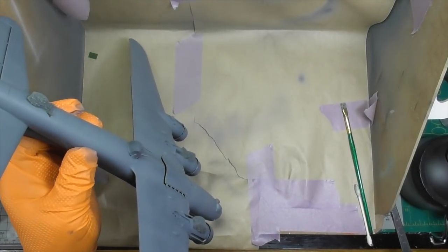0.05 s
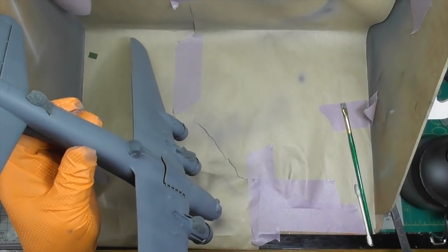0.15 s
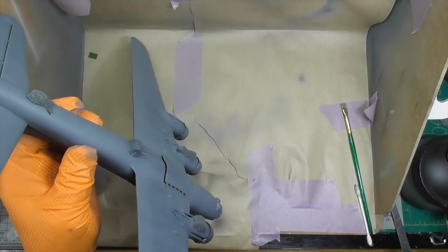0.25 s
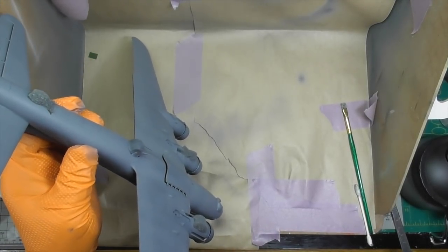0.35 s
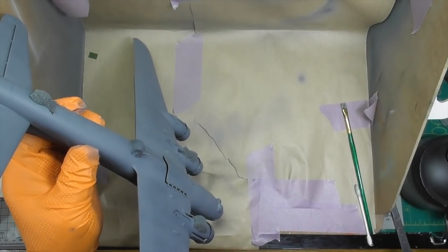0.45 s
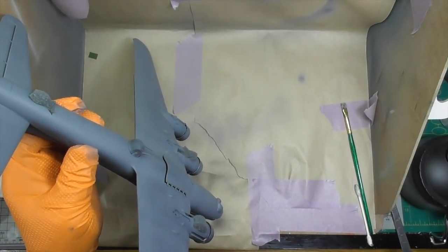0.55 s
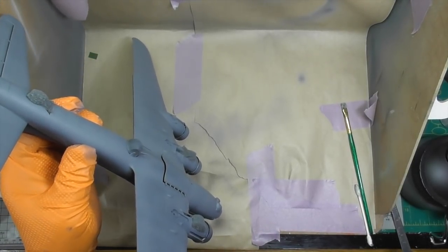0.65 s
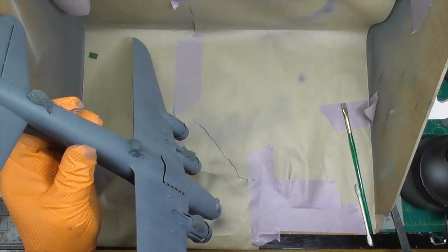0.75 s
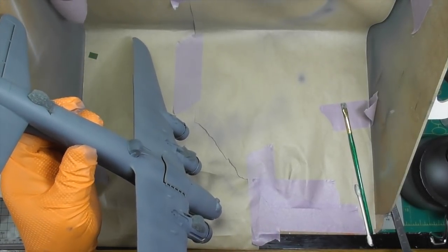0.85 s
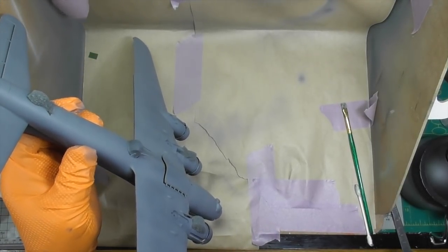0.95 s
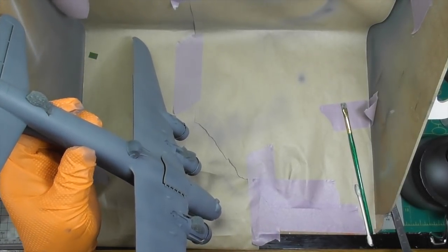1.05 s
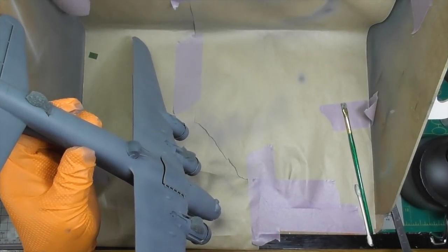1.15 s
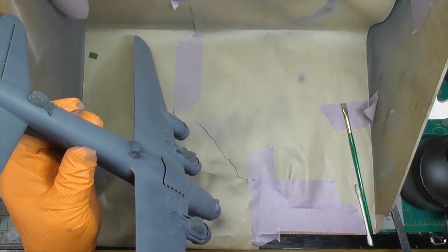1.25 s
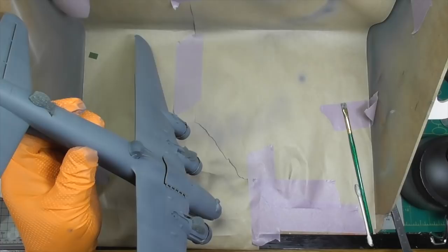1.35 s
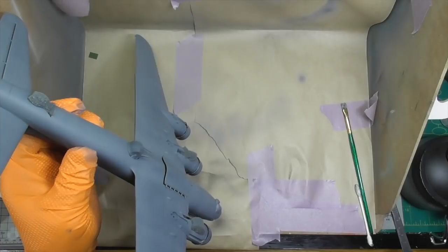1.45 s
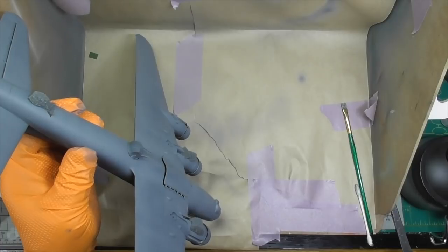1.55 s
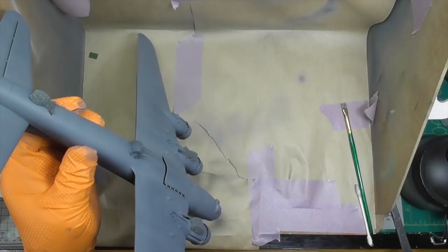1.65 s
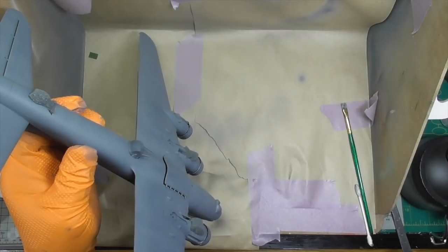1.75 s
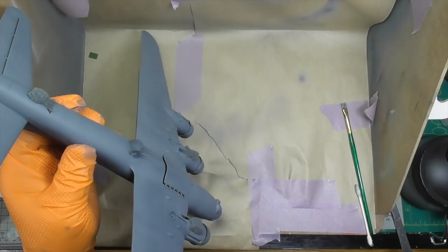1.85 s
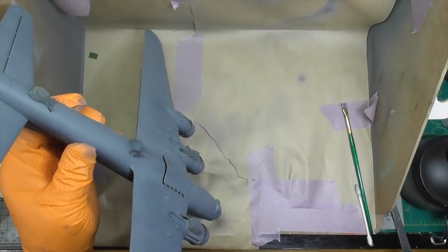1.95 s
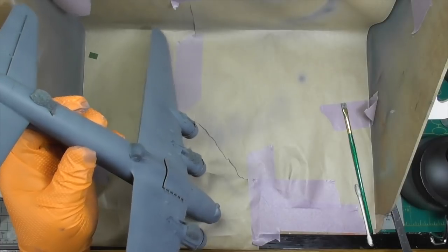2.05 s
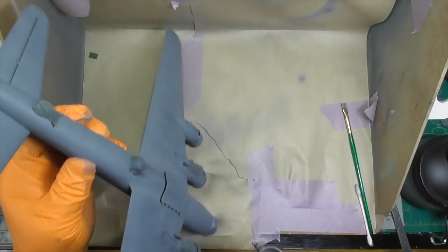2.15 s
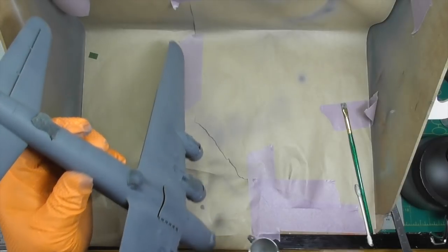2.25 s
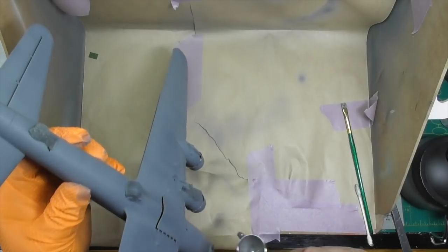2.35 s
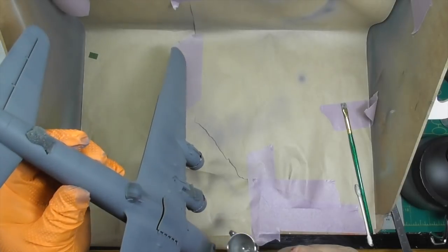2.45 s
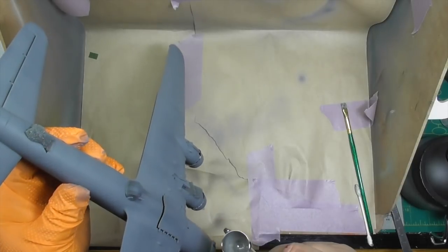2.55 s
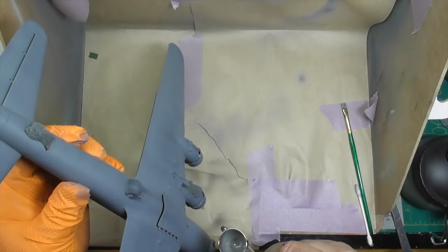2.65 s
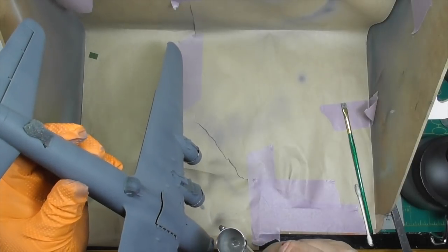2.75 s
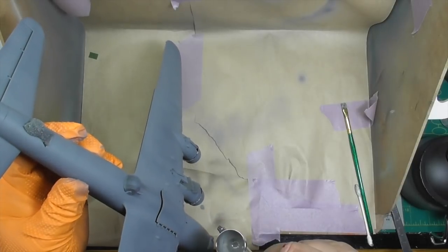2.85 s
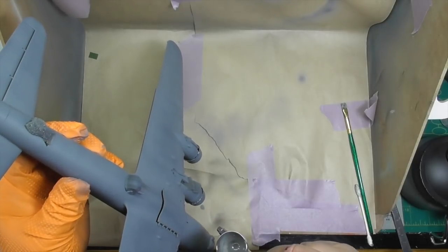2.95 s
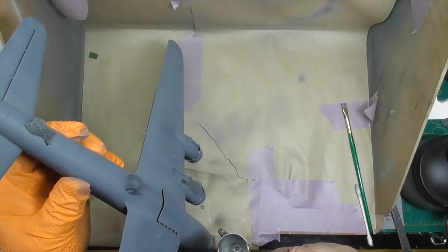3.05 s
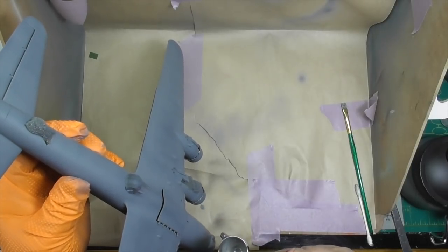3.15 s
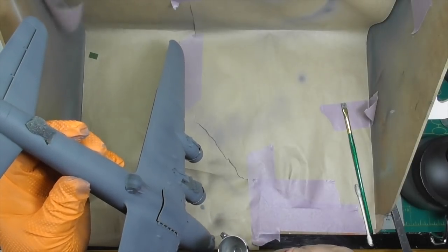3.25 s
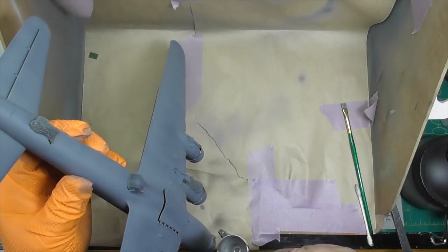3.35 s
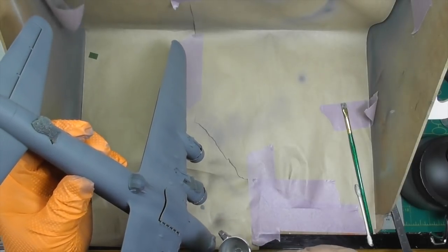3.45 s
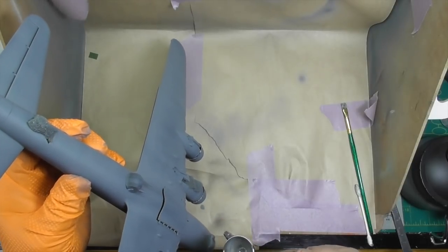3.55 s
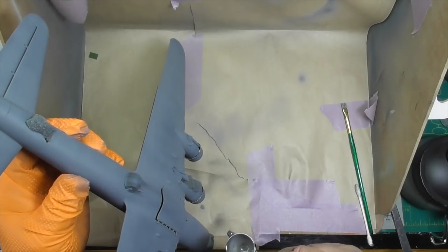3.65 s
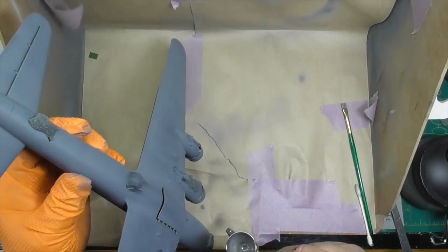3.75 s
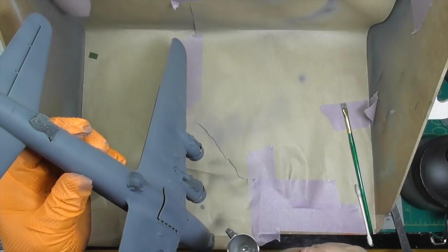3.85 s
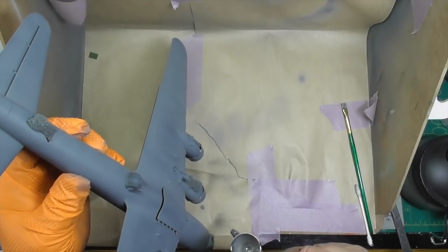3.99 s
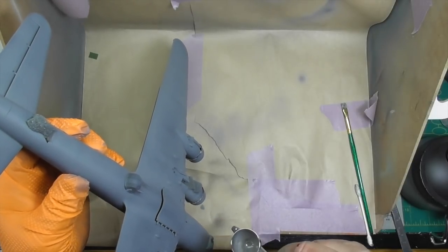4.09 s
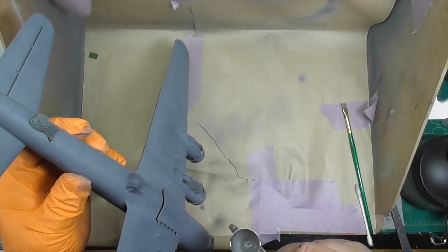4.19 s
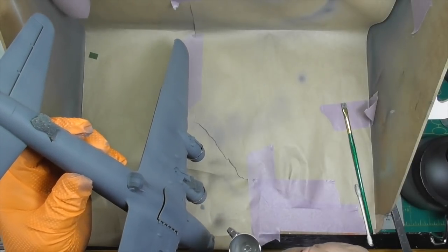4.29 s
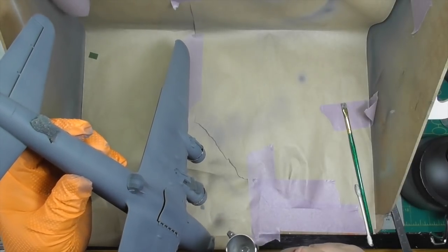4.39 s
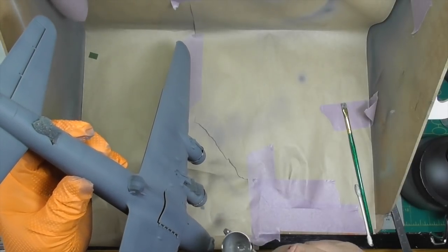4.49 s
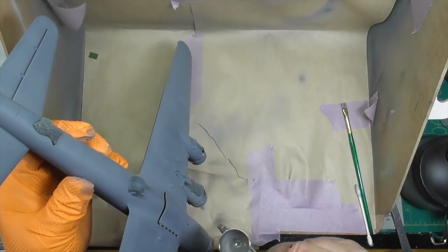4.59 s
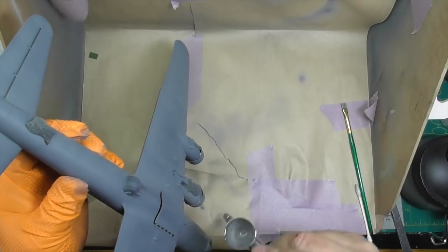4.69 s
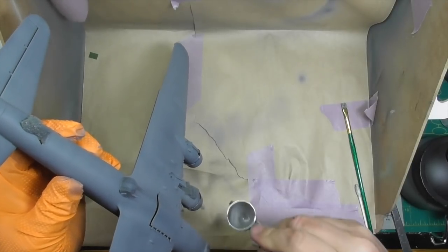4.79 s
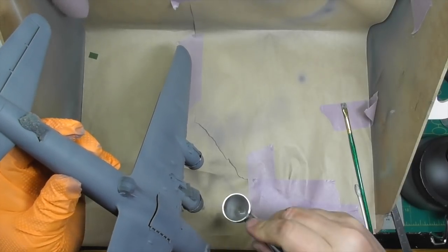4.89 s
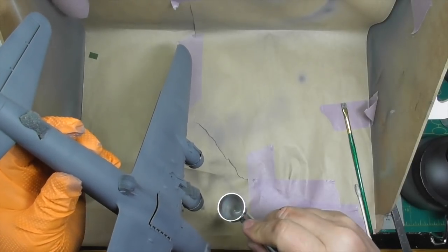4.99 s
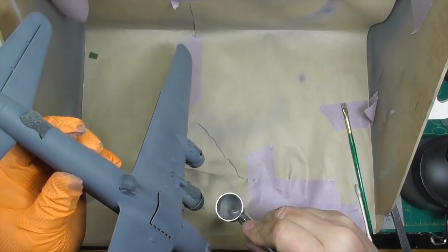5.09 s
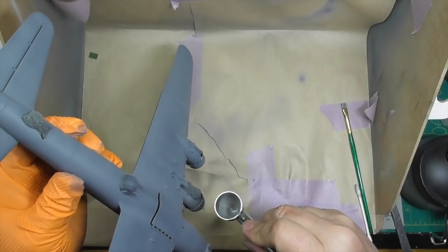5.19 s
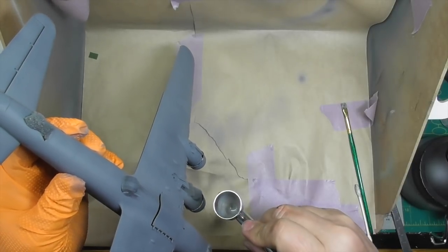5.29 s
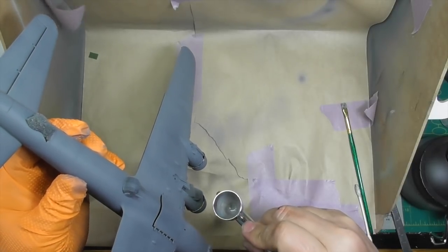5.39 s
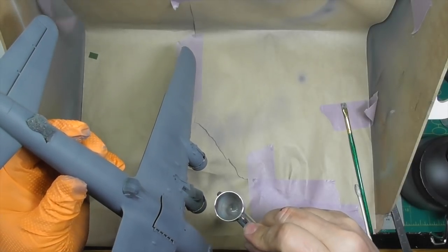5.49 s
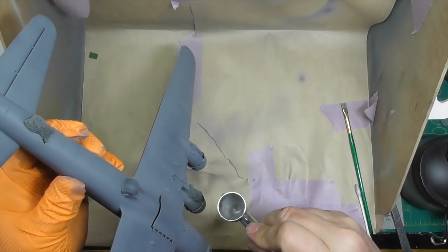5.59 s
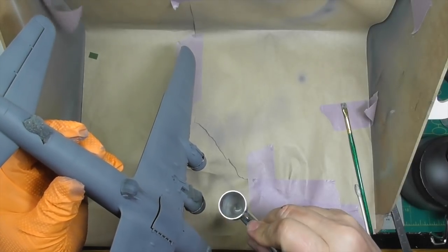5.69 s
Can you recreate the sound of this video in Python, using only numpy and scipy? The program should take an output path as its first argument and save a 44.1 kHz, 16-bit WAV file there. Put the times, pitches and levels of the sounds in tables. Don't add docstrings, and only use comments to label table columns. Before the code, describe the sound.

Sharp, airy hissing comes in three bursts, near the microphones, in a boxy little enclosure. The tone shifts and flutters as the jet crosses the model's wing and engines. Two short pauses expose a quiet fan wash and a very faint high whine; each begins with a hard little click of the trigger, the second with a dull glove rub. No speech.

```python
import sys
import numpy as np
from scipy import signal
from scipy.fft import rfft, irfft, next_fast_len
from scipy.io import wavfile
from scipy.ndimage import uniform_filter1d

SR = 44100
rng = np.random.default_rng(int(sys.argv[2]) if len(sys.argv) > 2 else 0)


def log_audio(samples):
    frames = np.atleast_2d(samples).T
    limited = np.clip(frames, -1, 1)
    pcm = np.round(limited * 32767).astype(np.int16)
    wavfile.write(sys.argv[1], SR, pcm)


def ratio(d):
    e = np.asarray(d, float) / 20
    return 10 ** e


N = 252686
TIME = np.arange(N) / SR

# opens_s, shuts_s
VALVE = [
    (-.1, 1.929),
    (2.495, 4.637),
    (4.991, 5.9),
]
# pitch_hz, level_db (per Hz)
JET = [(2940, -40), (5000, -35), (5170, -40), (5610, -17.5), (6650, -6.5), (8360, 2), (9740, -1.5),
       (13600, -1.5), (15600, -1)]


def evened(x):
    return x / np.sqrt(np.mean(x ** 2) + 1e-20)


def colour(x, shape):
    size = next_fast_len(N)
    hz = np.fft.rfftfreq(size, 1 / SR)
    return irfft(rfft(x, size) * shape(hz), size)[:N]


def read(points, hz):
    point_hz, value = np.transpose(points)
    return np.interp(np.log(hz + 1), np.log(point_hz + 1), value)


def peaks(modes, hz):
    power = 0
    for centre_hz, width_hz, level_db in modes:
        offset = 2 * (hz - centre_hz) / width_hz
        power = power + ratio(2 * level_db) / (1 + offset ** 2) ** 2
    return np.sqrt(power)


def air(shape, patchy_db, flicker_db, patch_bins=6, patch_frames=8, gaps=-9.):
    real, imaginary, patches = rng.standard_normal((N // 256 + 3, 257, 3)).T
    patches = uniform_filter1d(patches, max(int(patch_bins), 1), 0)
    patches = uniform_filter1d(patches, max(int(patch_frames), 1), 1)
    patches = evened(patches)
    flicker = rng.standard_normal(real.shape[1])
    gain = ratio(patchy_db * patches + flicker_db * flicker) * (patches > gaps)
    spectrum = (real + 1j * imaginary) * gain
    noise = signal.istft(spectrum, SR, window="cosine", nperseg=512, noverlap=256)[1]
    return evened(colour(noise[:N], shape))


def bumps(rows, power):
    middle_s, half_s, *gains_db = np.transpose(rows)
    coarse_s = TIME[::64]
    distance = np.abs((coarse_s - middle_s[:, None]) / half_s[:, None])
    humps = np.exp(-distance ** power)
    return [np.interp(TIME, coarse_s, gain_db @ humps) for gain_db in gains_db]


def valve(delay_s, rise_s, fall_s):
    ease_s, ease_db = 0.022, -1.5
    bursts = []
    for opens_s, shuts_s in VALVE:
        opening = np.clip((TIME - opens_s - delay_s) / rise_s + 1, 0, 1) ** 2.25
        easing_db = ease_db * np.clip((TIME - shuts_s) / ease_s + 1, 0, 1)
        closing_db = -20 * np.clip((TIME - shuts_s) / fall_s, 0, 5)
        bursts.append(opening * ratio(easing_db + closing_db))
    return np.max(bursts, 0)


def grip():
    # cap_ring_db, splash_db (over the jet), box_roar_db, draught_db, bright_draught_db
    holds = [
        (-2, -13, -34.5, -28.5, -32.5),
        (1.5, -13, -33.5, -28.5, -33),
        (-6, -16.5, -34, -25, -32.5),
    ]
    burst = np.searchsorted([shuts_s + .2 for _, shuts_s in VALVE], TIME)
    return np.transpose(holds)[:, burst]


def jet_hiss():
    def shape(hz):
        dip = 1 - .5 * peaks([(7780, 3100, 0.025)], hz)
        return ratio(read(JET, hz)) * dip
    return ratio(4.5) * air(shape, 1.7, 0.23)


def cap_ring():
    # pitch_hz, width_hz, level_db
    cap_modes = [(7155, 680, 1), (7830, 1170, 2), (8830, 1070, 0.5), (9910, 1900, -2.5)]
    return ratio(-2.0) * air(lambda hz: peaks(cap_modes, hz), 1.1, 0.44, patch_frames=16)


def splash():
    # pitch_hz, level_db (per Hz)
    splash_tone = [(820, -23), (1400, -9.5), (1580, -14), (1810, -7), (1970, -8.5), (2430, -7), (2840, -10),
                   (3230, -4.5), (5120, -8), (6500, -1.5), (8450, -18), (14300, -120)]
    return ratio(2.5) * air(lambda hz: ratio(read(splash_tone, hz)), 1.73, 0.88, patch_bins=4, patch_frames=23)


def edge_whistle():
    # pitch_hz, width_hz, level_db
    edge_modes = [(2490, 480, -2.5), (3950, 700, -5.5), (4850, 190, 2.5), (5600, 480, -0.5)]
    return ratio(4.5) * air(lambda hz: peaks(edge_modes, hz), 1.4, 0.44, patch_bins=2.2, patch_frames=23)


def box_roar():
    # pitch_hz, level_db (per Hz)
    roar_tone = [(140, -31), (230, -9.5), (365, -4), (481, -4.5), (535, -2), (705, -4), (829, 0),
                 (936, -5.5), (1240, -8), (1600, -21.5), (2080, -42), (3520, -120)]
    # pitch_hz, width_hz, level_db
    box_modes = [(347, 37, -5), (544, 17, 4.5), (870, 74, -2.5), (1260, 120, -13)]

    def shape(hz):
        return np.hypot(ratio(read(roar_tone, hz)), peaks(box_modes, hz))
    return ratio(0.38) * air(shape, 1.0, 1.0, patch_bins=1.6, patch_frames=18)


def port_hiss():
    # pitch_hz, level_db
    port_tone = [(9300, -82), (9900, -13), (10800, -7), (13000, -5), (14500, -8), (15500, -14.5)]

    def shape(hz):
        return ratio(read(JET, hz) + read(port_tone, hz))
    return ratio(-6.5) * air(shape, 3.2, 0.43, patch_bins=9.7, patch_frames=9.9, gaps=-.65)


def draught(level_db, bright_db):
    # pitch_hz, level_db (per Hz)
    wind_tone = [(12, -37), (20, -8.5), (108, 0), (250, -2), (470, -4.5), (651, -6), (1060, -12.5),
                 (1590, -25), (2250, -28.5), (2600, -37.5), (3380, -67), (5720, -120)]

    def wind(hz):
        return ratio(read(wind_tone, hz))

    def upper(hz):
        return 1 / (1 + (420 / (hz + 1)) ** 4)
    low = air(lambda hz: wind(hz) * np.sqrt(1 - upper(hz)), 1.9, 0.88, patch_bins=2, patch_frames=6.6)
    high = air(lambda hz: wind(hz) * np.sqrt(upper(hz)), 1.8, 0.53, patch_bins=3)
    common = ratio(-16.5) * air(lambda hz: wind(hz) * (1 - upper(1.03 * hz)), 1.6, 0.64, patch_bins=1.9)
    opening = valve(0.016, 0.022, 0.0098)
    level = ratio(level_db - 1.35) * opening
    bright = ratio(bright_db - .5) * opening
    return level * common, level * low + bright * high


def spray():
    # time_s, jet_db
    pressure = [(0.0, -23.5), (.05, -25.5), (.35, -24.5), (.57, -22.5), (.75, -22.5), (.9, -22.5),
                (1.4, -21), (1.92, -23), (2.52, -25.5), (2.7, -24.5), (3.2, -24.5), (3.5, -21), (3.65, -22),
                (4.3, -21.5), (4.63, -22), (5.02, -22.5), (5.5, -22), (5.73, -19)]
    # middle_s, half_length_s, splash_gain_db, cap_ring_gain_db
    crossings = [(.02, 0.16, 6.5, 2.5), (.24, 0.062, 6.5, 6.5), (.80, 0.046, 6, 5.5),
                 (1.10, 0.033, 6.5, 4.5), (1.23, 0.033, 4, 5), (1.46, 0.032, 1.5, 5), (1.62, .06, 1.5, 3),
                 (1.86, 0.083, 2.5, 3), (2.64, 0.16, 8.5, 0.5), (2.82, 0.036, 3.5, 5.5),
                 (2.93, 0.069, 2.5, -0.5), (3.04, .05, 3.5, 2.5), (3.43, 0.045, 4, 4.5), (3.62, 0.1, 0, 1),
                 (3.78, 0.056, 2, 1.5), (3.92, 0.045, -1, -4), (4.20, 0.12, 2, 0.5), (4.28, 0.06, -1.5, -5),
                 (4.54, 0.15, 3, 0.5), (5.10, .05, -3.5, -5), (5.27, 0.1, 3.5, 5.5), (5.46, 0.084, 3, 1),
                 (5.68, 0.078, 3.5, 5)]
    # middle_s, half_length_s, draught_db, bright_db, roar_gain_db
    strokes = [(.06, .08, 2, -2, 0), (.29, 0.055, 3, -2, 1.5), (.51, 0.16, 4, 2, 6.5),
               (.94, 0.13, 6.5, 5.5, 3.5), (1.39, .11, 6.5, 5.5, 1.5), (1.74, 0.12, 6, 5.5, 1),
               (2.57, 0.071, -1, 2, 1), (2.76, 0.057, 2, 0, -0.5), (3.04, .13, -0.5, 5, 5.5),
               (3.39, 0.033, 3, 5, 8), (3.17, 0.037, 2, 2, -1.5), (3.50, 0.096, 6.5, 8.5, 2.5),
               (3.89, .12, 4, 7.5, 3.5), (4.30, 0.14, 3.5, 4.5, 2.5), (4.57, .06, 2, 3.5, 4),
               (5.10, .07, -3.5, 3, -2.5), (5.30, 0.15, 0.5, 1, 1), (5.51, 0.093, -2.5, -0.5, 4.5),
               (5.67, 0.084, -1.5, 1, 0.5)]
    cap_db, splash_db, roar_db, wind_db, bright_db = grip()
    hit_db, ringing_db = bumps(crossings, power=2.0)
    swing_db, bright_swing_db, fill_db = bumps(strokes, power=2.55)
    jet_db = np.interp(TIME, *np.transpose(pressure)) - 0.23 * ringing_db
    cap_db = cap_db + ringing_db
    splash_db = splash_db + hit_db
    roar_db = roar_db + fill_db - jet_db

    treble = ratio(jet_db) * valve(.014, 0.027, 0.0074)
    body = ratio(jet_db) * valve(0.012, 0.031, 0.0055)
    nozzle = jet_hiss() + ratio(cap_db) * cap_ring()
    impact = ratio(splash_db) * splash()
    impact += ratio(2.22 * splash_db) * edge_whistle()
    impact += ratio(roar_db) * box_roar()
    gust, gust_side = draught(wind_db + swing_db, bright_db + bright_swing_db)
    mid = treble * nozzle + body * impact + gust
    return mid, treble * port_hiss() + gust_side


def booth(x):
    # pitch_hz, fade_s
    fade_times = [(300, 0.48), (1500, 0.34), (6000, 0.18), (15000, 0.1)]
    taps = np.zeros(SR // 2)
    at = np.arange(200, SR // 2 - 20, 20)
    signs = rng.choice([-1., 1.], len(at))
    taps[at + rng.integers(0, 20, len(at))] = signs
    hz, t, spectrum = signal.stft(taps, SR, nperseg=256)
    fade = ratio(-60 * t / read(fade_times, hz)[:, None])
    tail = signal.istft(spectrum * fade, SR, nperseg=256)[1]
    return signal.oaconvolve(x, tail / np.linalg.norm(tail))[:N]


def fan_and_lamp():
    # pitch_hz, level_db
    fan_tone = [(20, -13), (80, -6), (150, -6), (500, 0), (1000, -1), (1300, -6), (1650, -14), (2500, -17),
                (4000, -21), (5100, -27), (6500, -21), (8000, -19), (10000, -21), (13500, -22),
                (14800, -18), (15800, -17)]
    # pitch_hz, level_db (per Hz)
    fan_side_tone = [(12, -39), (20, -7), (290, -6), (781, -13), (1250, -25), (1470, -43), (7910, -50),
                     (8590, -38), (14500, -20)]
    # pitch_hz, level_db
    hum = [(58.6, -59.5), (960, -62.5)]
    # lowest_line_hz, levels_db (one for each line)
    whine = [(14675, [-81, -78, -81, -68, -71, -68, -74, -74, -79]), (15188, [-80, -81, -73, -75, -67])]
    lines = list(hum)
    for lowest_hz, levels_db in whine:
        for k, level_db in enumerate(levels_db):
            lines.append((lowest_hz + k * 120, level_db))
    tones = np.zeros(N)
    for pitch_hz, level_db in lines:
        tones += ratio(level_db) * np.sqrt(2) * np.cos(2 * np.pi * pitch_hz * TIME)
    wash = ratio(-52.3) * air(lambda hz: ratio(read(fan_tone, hz)), 0.63, 0.18)
    wash_side = ratio(-56) * air(lambda hz: ratio(read(fan_side_tone, hz)), 1.3, 0.4)
    return wash + tones, wash_side + 0.098 * tones


def snaps():
    # time_s, peak_db, lean_db (to the cap's mode)
    knocks = [
        (1.980, -18, -4),
        (2.0824, -52, 0),
        (2.157, -43, -2),
        (4.6906, -15, 2.5),
        (4.7274, -44, 2),
    ]
    # pitch_hz, level_db, fade_s (by 60 dB)
    brass = [(2160, -15, 0.0074), (3300, -15.5, 0.0065), (4440, -19, .007), (5870, -9, 0.01),
             (7450, -3.5, 0.0044), (8640, -0.5, 0.0055), (10400, -17, .005), (11200, -18, 0.0046),
             (12800, -18, .005), (15000, -16, .005)]
    cap_mode = 4
    out = np.zeros(N)
    t = np.arange(1500) / SR
    chance = rng.standard_normal((len(knocks), len(brass), 2))
    for (time_s, peak_db, lean_db), luck in zip(knocks, chance):
        ring = np.zeros(len(t))
        for k, (pitch_hz, level_db, fade_s) in enumerate(brass):
            luck_db, phase = luck[k]
            start_db = level_db + luck_db + lean_db * (k == cap_mode)
            fading_db = -60 * np.maximum(t - .0011, 0) / (0.64 * fade_s)
            ring += ratio(start_db + fading_db) * np.sin(2 * np.pi * (pitch_hz * t + phase))
        ring *= np.minimum(t / 0.00034, 1)
        ring[115:] += 0.28 * ring[:-115]
        at = round((time_s + .0005) * SR)
        out[at:at + len(t)] += ratio(peak_db) * ring / abs(ring).max()
    return out


def scuff():
    # (pitch_hz, width_hz, level_db)
    glove_rub = (4.725, 0.033, -53, [(1470, 800, 0), (2110, 640, -1)])
    middle_s, half_s, level_db, modes = glove_rub
    rub = evened(colour(rng.standard_normal(N), lambda hz: peaks(modes, hz)))
    return ratio(level_db) * rub * np.exp(-((TIME - middle_s) / half_s) ** 2)


def scene():
    jet, jet_side = spray()
    floor, floor_side = fan_and_lamp()
    knocks = snaps()
    echoes = ratio(-16.5) * booth(jet + 0.23 * knocks)
    echoes_side = ratio(-30.0) * booth(jet_side)
    mid = jet + knocks + echoes + scuff() + floor
    side = jet_side + echoes_side + 0.16 * knocks + floor_side
    return np.array([mid + side, mid - side])


def band_limit(x):
    return signal.sosfilt(signal.butter(12, 17080, fs=SR, output="sos"), x)


def record(dry):
    edge = signal.firwin(1501, 15740, window=("kaiser", 9), fs=SR)
    mix = signal.oaconvolve(dry, edge[None], "same")
    return band_limit(mix)


dry = scene()
out = record(dry)
log_audio(out)
```